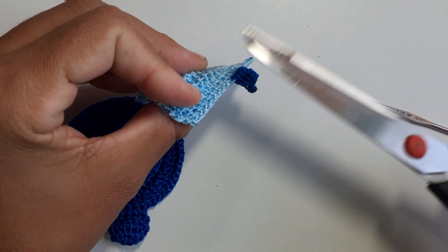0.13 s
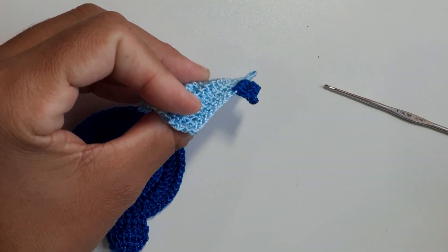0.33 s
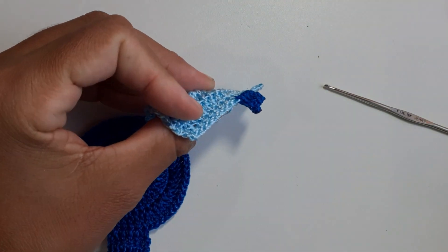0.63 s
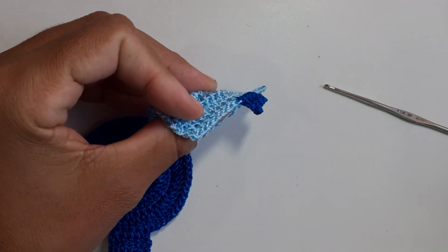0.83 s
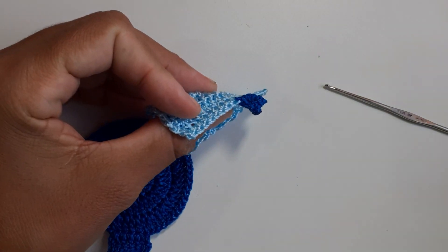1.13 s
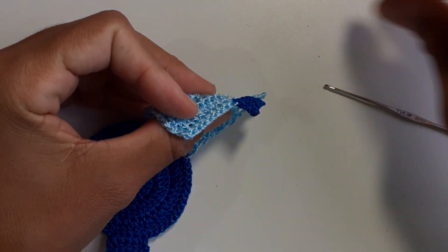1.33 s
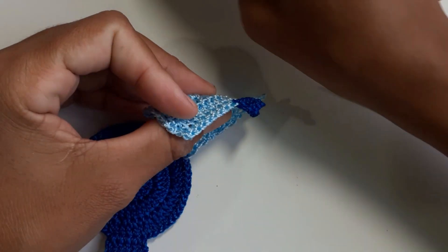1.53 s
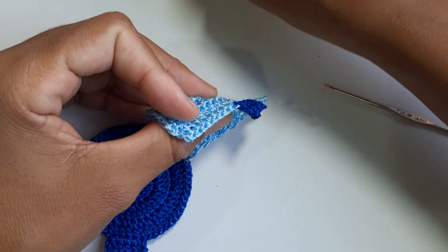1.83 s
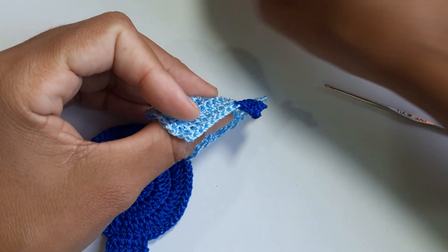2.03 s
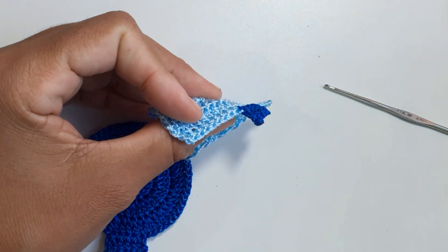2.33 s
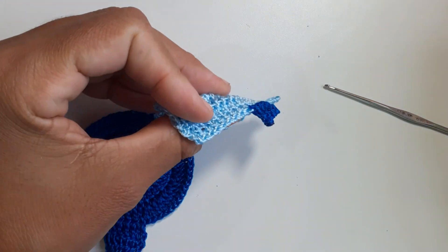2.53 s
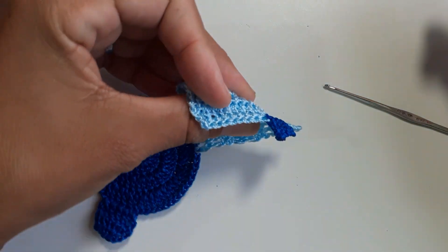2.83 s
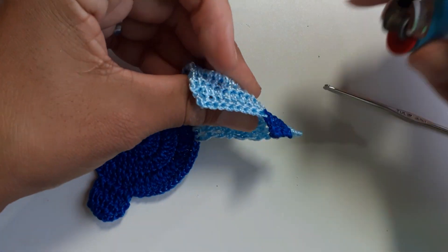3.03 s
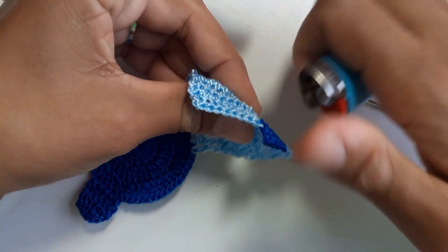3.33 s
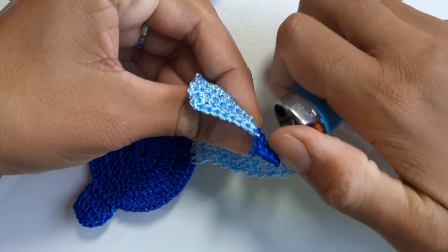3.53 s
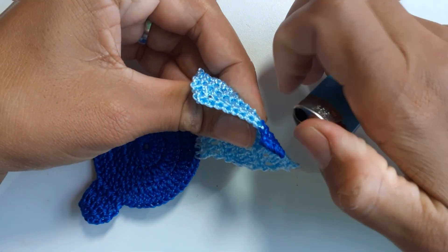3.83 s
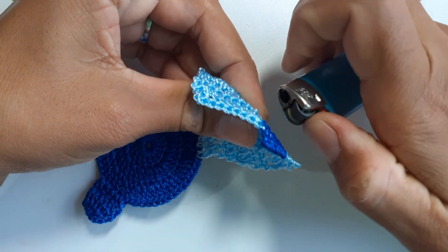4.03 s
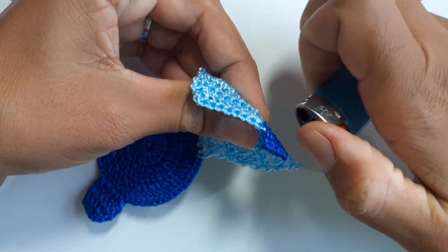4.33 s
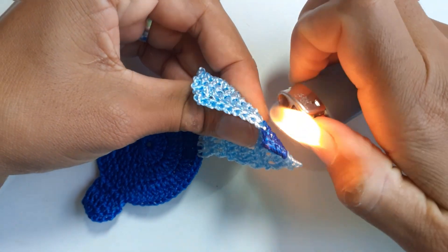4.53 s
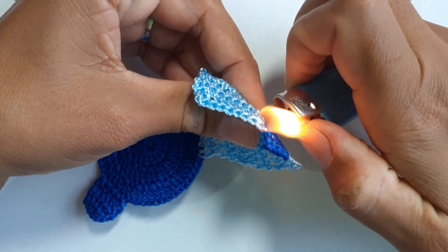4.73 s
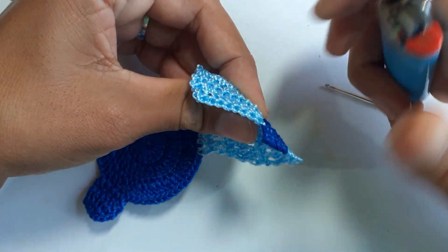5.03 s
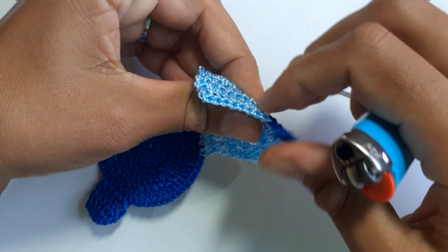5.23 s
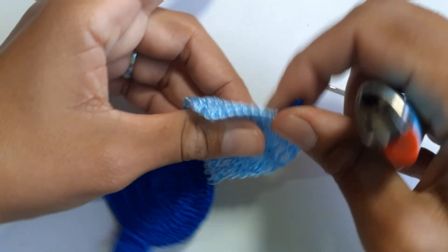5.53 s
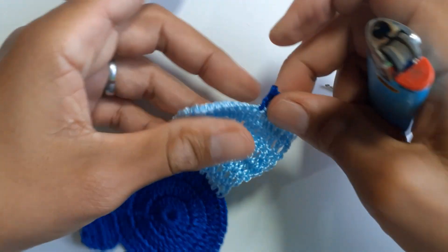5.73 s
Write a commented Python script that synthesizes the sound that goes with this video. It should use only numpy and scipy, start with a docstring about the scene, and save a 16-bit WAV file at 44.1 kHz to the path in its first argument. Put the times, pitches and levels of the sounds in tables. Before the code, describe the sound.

Close up at a craft table, scissors tap, squeak faintly and drop with a woody thump and rapid metallic rattle. After a calm with tiny handling rustles, a lighter is picked up with a dull knock. Two sharp flint rasps follow about half a second apart, the first cracking harder, then soft gas and a release click. The small room reflects briefly over low rumble.

```python
"""Scissors finish a snip and clatter down on a craft table in a small room, close to two microphones.
Blows on the table excite decaying modes and bursts of coloured noise; the loose blades rattle as they rock.
A pocket lighter is knocked about and struck twice: rasping noise, ringing hood, sparks, then blowing gas.
Grainy noise makes squeaks, brushed yarn and rubbing skin. Below lie a rumble that grows overall, a dull wash,
a hiss and a wavering hum. The room answers the table and lighter with a diffuse noise tail."""
import sys
import numpy as np
from scipy import signal
from scipy.fft import rfft, irfft, next_fast_len
from scipy.io import wavfile

SR = 44100
rng = np.random.default_rng(int(sys.argv[2]) if len(sys.argv) > 2 else 0)


def generate_wav(signal):
    """Clip the signal to [-1, 1] and save it as 16-bit WAV at the path in sys.argv[1]."""
    frames = np.transpose(np.atleast_2d(signal))
    scaled = np.clip(frames, -1, 1) * 32767
    pcm = np.round(scaled).astype(np.int16)
    wavfile.write(sys.argv[1], SR, pcm)


N = 260190
TIME = np.arange(N) / SR


def from_db(db):
    """Turn a level in dB into an amplitude factor."""
    return 10 ** (np.asarray(db) / 20)


def at_hz(points, hz):
    """Read a table along a log-frequency axis."""
    knots, values = np.transpose(points)
    return np.interp(np.log(np.maximum(hz, 1)), np.log(knots), values)


def dying(age, t60):
    """Amplitude that falls 60 dB in t60 seconds."""
    return np.exp(-np.log(1000) * age / max(t60, 1e-4))


def burst(s, rise, t60):
    """Envelope that swells exponentially to 1 at time s and dies away."""
    out = np.zeros(N)
    start, top, end = np.searchsorted(TIME, [s - 10 * rise, s, s + 2 * t60])
    out[start:top] = np.exp((TIME[start:top] - s) / max(rise, 1e-5))
    out[top:end] = dying(TIME[top:end] - s, t60)
    return out


def blows(rows, rise=0.00061):
    """Joint envelope of blows (time [s], level [dB], t60 [s]); their powers add."""
    power = sum((from_db(db) * burst(s, rise, t60)) ** 2 for s, db, t60 in rows)
    return np.sqrt(power)


def with_rebound(hits, lag, loss_db):
    """Each hit (time [s], level [dB]) is followed by a weaker one."""
    return list(hits) + [(s + lag, db - loss_db) for s, db in hits]


# likeness of the two microphones, limited to -1..1 in use: (frequency [Hz], correlation)
MIC_LIKENESS = [(100, 2), (350, 0.76), (800, 0.32), (1600, -0.19), (3500, 0.05), (12000, 0)]


def two_mics(pair, hz, side):
    """Turn two unrelated signals into left and right with the likeness and balance of that frequency."""
    alike = np.clip(at_hz(MIC_LIKENESS, hz), -1, 1)
    lean = from_db(at_hz(side, hz))
    mid = np.sqrt(1 + alike) * pair[0]
    apart = np.sqrt(1 - alike) * pair[1]
    return np.array([lean * (mid + apart), mid - apart]) / np.sqrt(1 + lean ** 2)


def noise(colour, side):
    """Stereo noise of a given colour, rms 1: the dense, unresolved vibration of a part."""
    size = next_fast_len(N, real=True)
    hz = np.arange(size // 2 + 1) * SR / size
    spectra = two_mics(rfft(rng.standard_normal((2, size))), hz, side)
    out = irfft(spectra * from_db(at_hz(colour, hz)), size)[:, :N]
    return out / np.sqrt(np.mean(out ** 2))


def grain(per_s, depth_db):
    """Random fluctuation of level, fast or slow, as a gain of rms 1."""
    steps = rng.standard_normal(N)
    gain = from_db(depth_db * np.interp(TIME * per_s, np.arange(N), steps))
    return gain / np.sqrt(np.mean(gain ** 2))


def struck(hits, modes, side, spread_db):
    """Each hit rings every mode with its own strength and phase; the changing grip detunes it a little."""
    out, age = np.zeros((2, N + SR)), TIME[:SR // 5]
    for hz, mode_db, t60 in modes:
        shape = dying(age, t60) * (1 - np.exp(-2 * hz * age))
        for s, db in hits:
            strength = from_db(db + mode_db + spread_db * rng.standard_normal())
            detune = 1 + 0.02 * rng.standard_normal()
            ring = shape * np.exp(2j * np.pi * hz * age * detune)
            heard = two_mics(np.exp(2j * np.pi * rng.random(2)), hz, side)
            at = max(round(s * SR), 0)
            out[:, at:at + len(age)] += strength * np.real(heard[:, None] * ring)
    return out[:, :N]


SNIP_S, SNIP_DB, SNIP_T60_S = 0.0, -47, .21   # the blades slide shut
# colour of the shearing blades: (frequency [Hz], relative level [dB])
BLADE_COLOUR = [(300, -6), (1000, -18), (2300, -4), (3600, -6), (5200, -3.5), (6400, 5.5), (7500, -2.5),
                (9000, 5.5), (10500, -2.5), (16000, -10)]
# microphone balance for sound from the table: (frequency [Hz], left minus right [dB])
TABLE_BALANCE = [(100, -2.5), (400, -5.5), (900, -2.5), (1700, -5), (3500, -3), (7000, -3), (12000, 1.5)]


def snip():
    """The blades shear past each other with a thin steel hiss."""
    return blows([(SNIP_S, SNIP_DB, SNIP_T60_S)]) * noise(BLADE_COLOUR, TABLE_BALANCE)


RUMBLE_REF_DB = -63
MURK_DB, MURK_FOLLOWS = -76.5, 0.87   # at a rumble of RUMBLE_REF_DB; dB per dB of rumble
HISS_DB = -81
HANDLING_FROM_S, HISS_GROWTH_DB_PER_S = 4, 3.5   # the hiss grows once both hands are at work
# room rumble, before the joint lift of all three layers: (time [s], level [dB])
RUMBLE_LEVEL = [(0, -77.5), (0.6, -75.5), (1.6, -69), (2.5, -71), (3.5, -71), (4.0, -64.5), (5.9, -63)]
# colour of the rumble: (frequency [Hz], relative level [dB])
RUMBLE_COLOUR = [(20, -28.5), (42, -17), (58, -6.5), (80, -6.5), (110, -2), (150, -1), (210, -3), (330, 4),
                 (420, -5.5), (550, -15), (900, -26.5), (2000, -49.5)]
# colour of the dull wash: (frequency [Hz], relative level [dB])
MURK_COLOUR = [(300, -8), (600, 1.5), (1000, 1.5), (1300, -4), (1650, -1.5), (2400, -12), (4000, -22),
               (9000, -31.5)]
# colour of the fine hiss: (frequency [Hz], relative level [dB])
HISS_COLOUR = [(1000, -11), (3000, -5.5), (5000, -4.5), (6800, -0.5), (9000, 1), (10500, -4.5), (15500, -7)]
# microphone balance for sound from the room: (frequency [Hz], left minus right [dB])
ROOM_BALANCE = [(60, -10.5), (350, -9), (1500, -7), (3500, -3.5), (7000, -7), (12000, 0)]


def background():
    """Low room rumble, a dull wash that follows it and a fine hiss: coloured noises of slowly changing level."""
    rumble_db = np.interp(TIME, *np.transpose(RUMBLE_LEVEL))
    murk_db = MURK_DB + MURK_FOLLOWS * (rumble_db - RUMBLE_REF_DB)
    hiss_db = HISS_DB + HISS_GROWTH_DB_PER_S * np.maximum(TIME - HANDLING_FROM_S, 0)
    layers = [(rumble_db, RUMBLE_COLOUR), (murk_db, MURK_COLOUR), (hiss_db, HISS_COLOUR)]
    lift = from_db(4.0)
    return lift * sum(from_db(db) * noise(colour, ROOM_BALANCE) for db, colour in layers)


HUM_HZ, HUM_DB = 57.4, -71   # level before the balance


def hum():
    """A faint low sine that wavers in level, weaker in the left microphone."""
    tone = from_db(HUM_DB) * np.sin(2 * np.pi * HUM_HZ * TIME)
    balance = from_db([[-4.0], [3.0]])
    return tone * grain(per_s=6.9, depth_db=4.5) * balance


# the steel blades drop and rock ever faster, alternating stronger and weaker hits as the level sinks overall
DROP_S, DROP_DB = 1.1002, -18.5
BOUNCE_GAP_S, GAP_SHRINK_S = .053, .0099
BOUNCE_LOSS_DB, FAR_SIDE_LOSS_DB = 4.8, 6   # per bounce; extra on every second one


def bounces(count):
    """Hits of the rocking blades: each gap is shorter than the last by the same step."""
    hits = []
    for k in range(count):
        s = DROP_S + k * BOUNCE_GAP_S - k * (k - 1) / 2 * GAP_SHRINK_S
        far_side = k % 2
        hits.append((s, DROP_DB - k * BOUNCE_LOSS_DB - far_side * FAR_SIDE_LOSS_DB))
    return hits


REBOUND_S, REBOUND_LOSS_DB = .008, 7   # every knock lands a second time
BOUNCE_HANDLE_DB = -16   # share of a blade bounce in the handles
SETTLE_S, SETTLE_DB, SETTLE_T60_S = 1.342, -46, 0.23   # the scissors slip from the hand
# handles knock on the table, before each layer's gain: (time [s], table top [dB], handles [dB])
HANDLE_KNOCKS = [(0.672, -59.5, -55), (0.688, -53.5, -51.5), (0.918, -48, -47.5), (1.0845, -32.5, -40.5),
                 (1.117, -27.5, -40), (1.132, -30.5, -34.5), (1.1616, -41, -38.5), (1.212, -37.5, -43.5),
                 (1.252, -45.5, -47.5)]
# ringing of the table top: (frequency [Hz], relative level [dB], t60 [s])
TABLE_TOP_MODES = [(132, -3, 0.086), (148, -6.5, .1), (242, -13.5, 0.18), (335.7, -5, 0.18),
                   (418, -4.5, 0.12), (466, -5, 0.11), (516, -2, 0.027), (604.5, 4.5, 0.023),
                   (593, 4.5, 0.039), (652, -1, 0.05), (779, -7, 0.07), (889.4, -2.5, 0.099)]
# ringing of the scissors: (frequency [Hz], relative level [dB], t60 [s])
SCISSOR_RINGS = [(1031, -0.5, 0.078), (1240, -10.5, 0.052), (1554, 1.5, 0.12), (1455, -3.5, .06),
                 (1614, -5.5, 0.067), (1772, -6, .06), (2064, -3.5, 0.074), (2850, -13.5, 0.045),
                 (3330, -28.5, 0.046)]
# colour of the thudding table: (frequency [Hz], relative level [dB])
THUD_COLOUR = [(35, -27), (60, -15), (130, -3), (200, 2.5), (350, 5.5), (620, 5), (1000, -9), (2000, -17),
               (5000, -49)]
# colour of the clacking handles: (frequency [Hz], relative level [dB])
HANDLE_COLOUR = [(200, -22), (600, -24), (1080, -6.5), (1320, -5), (1580, -1.5), (1900, -6), (2300, -7.5),
                 (3500, -7.5), (7000, -27), (15000, -46)]
# colour of the scissors settling: (frequency [Hz], relative level [dB])
SETTLING_COLOUR = [(150, -5), (500, -6), (900, -4), (2100, 2), (3500, -1), (6500, -5), (9000, -9),
                   (16000, -22)]


def scissors_laid_down():
    """Every knock thumps the table and sets the handles clacking and ringing; then the scissors settle."""
    on_table = with_rebound([(s, db) for s, db, _ in HANDLE_KNOCKS], REBOUND_S, REBOUND_LOSS_DB)
    on_handles = with_rebound([(s, db) for s, _, db in HANDLE_KNOCKS], REBOUND_S, REBOUND_LOSS_DB)
    on_handles += [(s, db + BOUNCE_HANDLE_DB) for s, db in bounces(count=6)]
    top = from_db(-5.0) * struck(on_table, TABLE_TOP_MODES, TABLE_BALANCE, spread_db=0.5)
    thud = blows([(s, db, .055) for s, db in on_table]) * noise(THUD_COLOUR, TABLE_BALANCE)
    ringing = from_db(-6.0) * struck(on_handles, SCISSOR_RINGS, TABLE_BALANCE, spread_db=4.0)
    clack = blows([(s, db, .045) for s, db in on_handles]) * noise(HANDLE_COLOUR, TABLE_BALANCE)
    settle = blows([(SETTLE_S, SETTLE_DB, SETTLE_T60_S)]) * noise(SETTLING_COLOUR, TABLE_BALANCE)
    settle = settle * grain(per_s=400, depth_db=4.5)
    return top + (thud + clack) * grain(per_s=1200, depth_db=2.0) + ringing + settle


PIVOT_DB, PIVOT_FOLLOWS = -42, .2   # rattle of the pivot at a 0 dB knock; dB of rattle per dB of knock
RATTLE_T60_S = 0.014
# colour of the rattling pivot: (frequency [Hz], relative level [dB])
PIVOT_COLOUR = [(500, -25), (1800, -7), (2900, 11.5), (4500, -5), (6300, -2), (8500, -12.5), (11000, -21.5),
                (16000, -34.5)]


def blade_rattle():
    """The loose blades tick against each other, hardest as they drop and faintly at every knock."""
    shaken = [(s, PIVOT_DB + PIVOT_FOLLOWS * db) for s, db, _ in HANDLE_KNOCKS]
    hits = bounces(count=6) + shaken
    return blows([(s, db, RATTLE_T60_S) for s, db in hits]) * noise(PIVOT_COLOUR, TABLE_BALANCE)


TICK_T60_S, TICK_REBOUND_S, TICK_REBOUND_LOSS_DB = .032, 0.0039, 6
# sharp ticks of blade tips, fingernails and the gas lever springing back: (time [s], level [dB])
SMALL_TICKS = [(0.673, -57), (0.6875, -53.5), (2.246, -67), (3.1, -65), (3.741, -72), (4.2332, -45.5),
               (4.9715, -47.5)]
# colour of a tick: (frequency [Hz], relative level [dB])
TICK_COLOUR = [(500, -11), (2000, -11.5), (2900, 5.5), (4000, -2.5), (5200, 1), (7000, 2.5), (9000, 0),
               (12000, -7.5), (16000, -4.5)]
# microphone balance for ticks and lighter strikes: (frequency [Hz], left minus right [dB])
LIGHTER_BALANCE = [(150, -14), (450, -9), (900, -1), (3000, -1), (7000, 2), (13000, 3.5)]


def ticks():
    """Tiny dry double clicks of the lever, blade tips and fingernails, as short noise bursts."""
    hits = with_rebound(SMALL_TICKS, TICK_REBOUND_S, TICK_REBOUND_LOSS_DB)
    return blows([(s, db, TICK_T60_S) for s, db in hits]) * noise(TICK_COLOUR, LIGHTER_BALANCE)


def friction(strokes, rise, t60, colour):
    """Strokes (time [s], level [dB]) of one kind: grainy noise that swells and dies away."""
    envelope = blows([(s, db, t60) for s, db in strokes], rise)
    return envelope * noise(colour, TABLE_BALANCE) * grain(per_s=130, depth_db=2.0)


# the scissors squeak as they slide on the table: (time [s], level [dB])
SQUEAK_STROKES = [(0.692, -57), (0.855, -61)]
# colour of a squeak: (frequency [Hz], relative level [dB])
SQUEAK_COLOUR = [(500, -28), (1050, -8.5), (1350, -24), (1600, 2), (1950, -21), (4000, -22.5), (12000, -34)]
# fingertips brush the yarn: (time [s], level [dB])
YARN_STROKES = [(1.9, -71), (2.285, -70.5), (2.885, -68), (3.1, -81)]
# colour of brushed yarn: (frequency [Hz], relative level [dB])
YARN_COLOUR = [(1500, -24), (4000, -12), (7000, -4), (12000, -2.5), (16000, -5)]
# skin rubs as the hand shifts its grip: (time [s], level [dB])
SKIN_STROKES = [(3.335, -74), (3.847, -62), (5.84, -68.5)]
# colour of rubbing skin: (frequency [Hz], relative level [dB])
SKIN_COLOUR = [(250, -9.5), (700, -1), (1400, 1), (2500, -11), (5000, -18), (12000, -31.5)]


def handling():
    """The scissors squeak on the table, fingertips brush yarn and skin rubs on the lighter."""
    squeaks = friction(SQUEAK_STROKES, rise=.012, t60=.22, colour=SQUEAK_COLOUR)
    yarn = friction(YARN_STROKES, rise=.012, t60=.3, colour=YARN_COLOUR)
    skin = friction(SKIN_STROKES, rise=.012, t60=.6, colour=SKIN_COLOUR)
    return squeaks + yarn + skin


# the lighter knocks as it is picked up: (time [s], body before its gain [dB], scuff [dB])
PICKUP_KNOCKS = [(2.604, -59.5, -62), (2.612, -43, -53.5), (2.618, -40, -58.5), (2.657, -74, -82),
                 (2.693, -62, -83)]
# hollow ringing of those knocks: (frequency [Hz], relative level [dB], t60 [s])
PICKUP_RINGS = [(334, 0, 0.13), (409, -1.5, 0.038), (610, -3.5, 0.037), (975, -6.5, 0.05),
                (1078, -2.5, 0.06), (1433, -9, 0.057), (2000, -13, 0.046)]
# colour of the scuffing plastic: (frequency [Hz], relative level [dB])
SCUFF_COLOUR = [(200, -17), (400, 2), (700, 4.5), (1200, -9), (2500, -4.5), (4800, -12), (6500, 4.5),
                (8000, -4), (10000, -12.5), (16000, -18)]


def lighter_picked_up():
    """Plastic scuffs along the table into a soft hollow knock."""
    hits = [(s, db) for s, db, _ in PICKUP_KNOCKS]
    knock = from_db(-3.0) * struck(hits, PICKUP_RINGS, ROOM_BALANCE, spread_db=0.0)
    scuff = sum(from_db(db) * burst(s, 0.0077, 0.03) for s, _, db in PICKUP_KNOCKS)
    return knock + scuff * noise(SCUFF_COLOUR, TABLE_BALANCE)


# levels on the hood, before its gain; the wheel's teeth catch ever harder up to the spark
TOOTH_DB, TOOTH_GROWTH_DB_PER_S, TOOTH_GAP_S = -41, 290, .0155
LEVER_LAG_S, LEVER_DB = .007, -36   # the lever bottoms out against the hood


def hood_hits(start, stop):
    """Hits of one strike: the teeth catch at even steps, then the lever bottoms out."""
    ahead = np.arange(0, stop - start + TOOTH_GAP_S / 2, TOOTH_GAP_S)
    teeth = [(stop - t, TOOTH_DB - TOOTH_GROWTH_DB_PER_S * t) for t in ahead]
    return teeth + [(stop + LEVER_LAG_S, LEVER_DB)]


THUMP_DB = -30   # thumb on the lever; the ringing body has a further gain
# two strikes of the wheel: (thumb rolls on [s], wheel bites [s], spark [s], rasp [dB],
# rasp swell time [s], spark [dB], spark rise [s])
WHEEL_STRIKES = [(3.957, 3.997, 4.0356, -31, 0.015, -12.5, .0006),
                 (4.464, 4.467, 4.4956, -28, .03, -17.5, 0.0015)]
# colour of wheel on flint: (frequency [Hz], relative level [dB])
RASP_COLOUR = [(200, -16.5), (1000, -14.5), (2000, -9), (3300, -2.5), (4000, -8), (5000, 1), (7500, 5),
               (10500, 2.5), (14500, 2), (16000, -1)]
# colour of the sparks: (frequency [Hz], relative level [dB])
SPARK_COLOUR = [(600, -8), (1500, -13.5), (3000, -6), (4300, -2.5), (5700, 2), (7800, 0), (10500, -5.5),
                (12500, -0.5), (14500, 3.5), (16000, -7)]
# colour of the thumb's thump: (frequency [Hz], relative level [dB])
THUMP_COLOUR = [(35, -19.5), (80, 1), (250, 2.5), (450, -7.5), (800, -14.5), (1500, -11.5), (4000, -30)]
# ringing of the metal hood: (frequency [Hz], relative level [dB], t60 [s])
HOOD_RINGS = [(2800, -6.5, 0.008), (3360, 0, 0.026), (4500, -3.5, 0.0046), (5340, -2.5, 0.011),
              (7200, -8.5, 0.014), (14000, -9, .01)]
# ringing of the lighter's body: (frequency [Hz], relative level [dB], t60 [s])
BODY_RINGS = [(172, -4, 0.034), (306, 0, 0.038), (410, -9.5, 0.031), (648, -17, 0.0075), (1140, -9, 0.033)]


def lighter_struck():
    """The wheel grinds ever harder over the flint, sparks crack off, and the thumb hits the gas lever."""
    rasp, crack, sizzle, thump, teeth = 0, 0, 0, 0, []
    for roll, start, stop, rasp_db, swell, spark_db, spark_rise in WHEEL_STRIKES:
        gripping = np.clip((TIME - start) / 0.016, 0, 1) ** 2
        rasp = rasp + from_db(rasp_db) * gripping * burst(stop, swell, 0.07)
        crack = crack + from_db(spark_db) * burst(stop, spark_rise, 0.014)
        sizzle = sizzle + from_db(spark_db - 16) * burst(stop, spark_rise, 0.087)   # sparks burn out in flight
        thump = thump + from_db(THUMP_DB) * burst(stop, 3e-4, 0.015)
        teeth = teeth + hood_hits(roll, stop)
    grit = grain(per_s=900, depth_db=1.5)
    flint = rasp * grit * noise(RASP_COLOUR, LIGHTER_BALANCE)
    sparks = (crack + sizzle * grit) * noise(SPARK_COLOUR, LIGHTER_BALANCE)
    hood = from_db(-2.0) * struck(teeth, HOOD_RINGS, LIGHTER_BALANCE, spread_db=1.5)
    thumb_hits = [(stop, THUMP_DB) for _, _, stop, *_ in WHEEL_STRIKES]
    body = from_db(-1.5) * struck(thumb_hits, BODY_RINGS, LIGHTER_BALANCE, spread_db=5.0)
    return flint + sparks + hood + body + thump * noise(THUMP_COLOUR, LIGHTER_BALANCE)


# the gas flares up, then sinks towards a small steady flame until the lever is let go
GAS_ON_S, GAS_OFF_S, GAS_RISE_S, GAS_DB = 4.5, 4.97, .08, -79.5
FLARE_S, FLARE_DB, FLARE_T60_S = 4.65, -69.5, 0.78
# colour of the blowing gas: (frequency [Hz], relative level [dB])
FLAME_COLOUR = [(300, -10), (1000, 3), (1720, -12), (1860, 9.5), (2030, -7), (2600, -20.5), (5000, -24),
                (15000, -29.5)]


def flame():
    """Gas blows softly through the lighter's metal hood while the lever is held."""
    valve = np.clip((TIME - GAS_ON_S) / GAS_RISE_S, 0, 1) * (TIME < GAS_OFF_S)
    flow = from_db(GAS_DB) + from_db(FLARE_DB) * burst(FLARE_S, GAS_RISE_S, FLARE_T60_S)
    return valve * flow * noise(FLAME_COLOUR, ROOM_BALANCE)


# decay of the small room: (frequency [Hz], t60 [s])
ROOM_DECAY = [(150, 0.97), (600, 0.39), (2000, .29), (6000, .31), (10000, 0.26), (15000, 0.23)]
# strength of its reflections, before the sends: (frequency [Hz], relative level [dB])
ROOM_STRENGTH = [(150, 3), (600, 1), (2000, 3), (6500, -2), (10000, 0), (15000, -3.5)]
# microphone balance of the reflections: (frequency [Hz], left minus right [dB])
REFLECTION_BALANCE = [(300, -0.5), (5000, -3.5), (12000, -4.5)]


def room(x):
    """Dense wall reflections follow after a short gap and die band by band."""
    age, tail = TIME[:SR // 2], 0
    edges = np.geomspace(60, 17000, 13)
    for low, high in zip(edges, edges[1:]):
        hz = np.sqrt(low * high)
        band_filter = signal.butter(2, [low, high], "band", fs=SR, output="sos")
        band = signal.sosfilt(band_filter, rng.standard_normal((2, len(age))))
        t60 = at_hz(ROOM_DECAY, hz)
        unit_energy = np.sqrt(2 * np.log(1000) / (t60 * SR))
        strength = unit_energy * from_db(at_hz(ROOM_STRENGTH, hz))
        tail = tail + two_mics(band, hz, REFLECTION_BALANCE) * dying(age, t60) * strength
    after_gap = np.clip(age / 0.0045 - .5, 0, 1)   # silent for 2.25 ms, full at 6.75 ms
    return signal.fftconvolve(x, tail * after_gap, axes=1)[:, :N]


def scene():
    """Dull knocks on the table fill the room more than the small bright clicks close to the microphones."""
    knocks = snip() + scissors_laid_down() + lighter_picked_up()
    clicks = blade_rattle() + lighter_struck() + ticks() + handling()
    reflections = room(from_db(-6.5) * knocks + from_db(-9.5) * clicks)
    return knocks + clicks + reflections + flame() + background() + hum()


def record(dry):
    """The deepest bass is rolled off, the loudest peaks are rounded and the top of the treble is cut steeply."""
    lean = signal.sosfilt(signal.butter(2, 42, "high", fs=SR, output="sos"), dry)
    rounded = .6 * np.tanh(lean / .6)
    treble_cut = signal.ellip(10, .1, 80, 16000, fs=SR, output="sos")
    return signal.sosfilt(treble_cut, rounded)


dry = scene()
out = record(dry)
generate_wav(out)
```